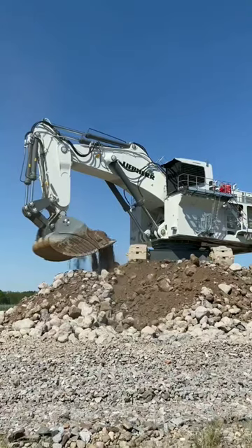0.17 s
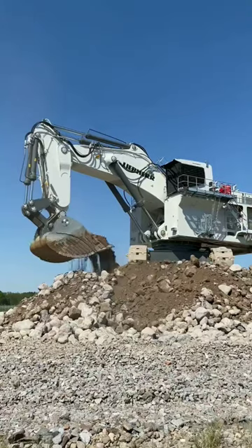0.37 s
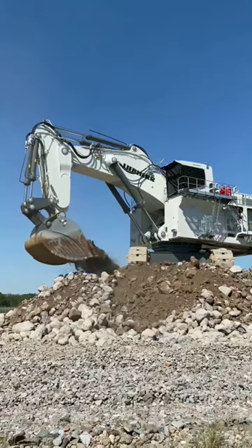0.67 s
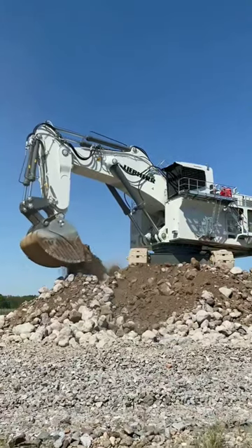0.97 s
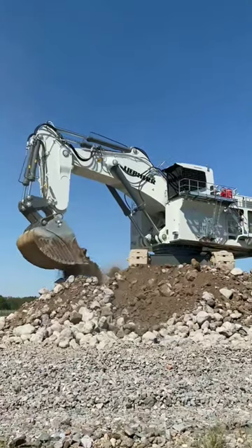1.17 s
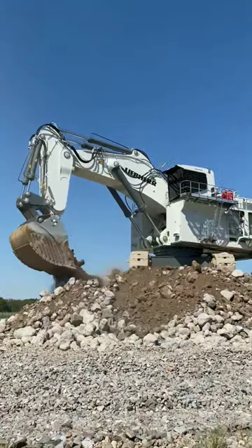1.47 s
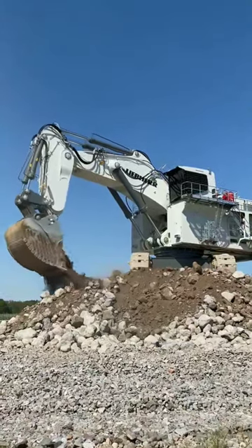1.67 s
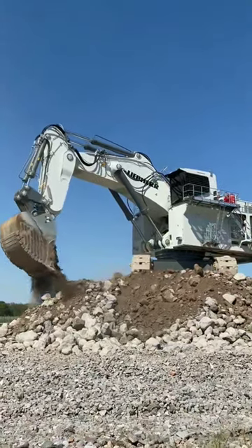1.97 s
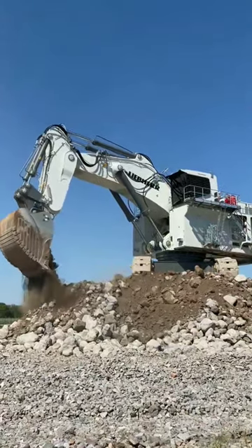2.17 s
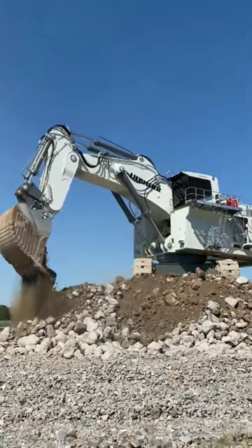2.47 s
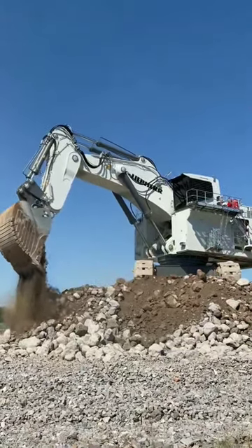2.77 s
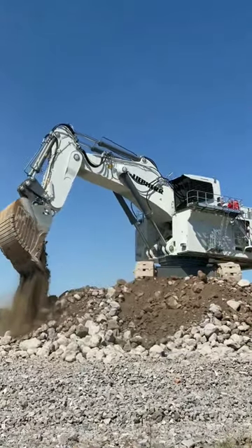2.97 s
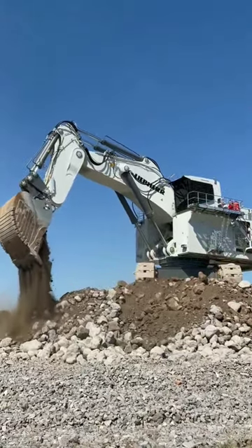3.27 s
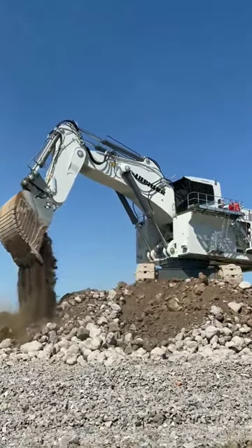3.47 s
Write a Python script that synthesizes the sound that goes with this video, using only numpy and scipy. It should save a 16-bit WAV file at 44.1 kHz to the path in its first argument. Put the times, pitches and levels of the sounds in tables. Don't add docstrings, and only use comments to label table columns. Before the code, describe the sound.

Rocks and soil pour from a big excavator's steel bucket, knocking loudly over a steady diesel roar.

```python
import sys
import numpy as np
from scipy import signal
from scipy.fft import rfft, irfft, next_fast_len
from scipy.io import wavfile
from scipy.ndimage import uniform_filter1d

SR = 44100
rng = np.random.default_rng(int(sys.argv[2]) if len(sys.argv) > 2 else 0)


def file_out(sig):
    cols = np.atleast_2d(sig).T
    lim = np.clip(cols, -1, 1)
    pcm = np.round(lim * 32767).astype(np.int16)
    wavfile.write(sys.argv[1], SR, pcm)


def attenuation_scalar(level_db):
    decades = np.asarray(level_db, float) / 20
    return 10 ** decades


N = 159201

# freq_hz, density_db_per_hz
ROAR_SPECTRUM = [(40, -8), (90, -7), (500, -1), (1100, -6.5), (2900, -13.5), (4200, -30), (7000, -22),
                 (13000, -65.5)]
# time_s, first_harmonic_db
PUMP_EFFORT = [
    (.2, -39.5),
    (1.7, -39.5),
    (2.1, -35.5),
    (2.35, -24),
    (2.55, -26.5),
    (2.62, -32.5),
    (2.86, -26.5),
    (2.95, -30),
    (3.6, -40),
]
# multiple, rest_level_db, effort_share
PUMP_HARMONICS = [(1, -40, 1.08), (2, -42, 0.32), (3, -48, 0.4), (4, -45.5, .2), (5, -46, 0.25),
                  (6, -48, 0.07), (7, -50, 0.11)]
# time_s, pitch_hz, level_db
TURBO_WHISTLE = [
    (.2, 5600, -63),
    (.7, 5700, -55),
    (1.25, 5700, -54),
    (1.6, 5950, -50),
    (2.0, 6190, -49),
    (2.35, 6170, -49),
    (2.6, 6190, -59),
    (3.2, 6300, -58),
    (3.6, 6300, -63),
]
# time_s, level_db
BUCKET_SHIFT = [
    (0.2, -32.5),
    (0.51, -22.5),
    (0.62, -36.5),
    (0.69, -21),
    (0.81, -28),
    (1.24, -23.5),
    (2.18, -34.5),
    (3.22, -23.5),
    (3.31, -21),
    (3.6, -32.5),
]
# time_s, stones_db, soil_db
POUR_LEVELS = [(.2, -45, -48), (.9, -34, -49.5), (1.45, -23.5, -39), (1.72, -32, -41.5),
               (2.3, -25.5, -41.5), (2.62, -16.5, -36), (2.8, -25, -37.5), (3.0, -15, -34.5),
               (3.12, -25.5, -29), (3.19, -40, -32), (3.32, -20, -29), (3.45, -19.5, -35.5),
               (3.6, -38.5, -36)]
# freq_hz, density_db_per_hz
SOIL_SPECTRUM = [(300, -4), (700, 1), (1300, -3), (2300, -7.5), (4500, -17), (6500, -15.5), (8500, -31.5),
                 (13500, -28)]
# start_s, peak_db, pitch_hz
ROCK_KNOCKS = [(0.252, -19, 350), (0.388, -11, 340), (0.487, -13.5, 397), (0.812, -26.5, 318),
               (0.853, -14.5, 323), (0.934, -11.5, 234), (0.971, -17, 480), (1.041, -15.5, 520),
               (1.097, -12.5, 268), (1.135, -15.5, 680), (1.224, -16, 238), (1.283, -14, 255),
               (1.292, -7.5, 267), (1.309, -17, 520), (1.38, -13, 610), (1.409, -10.5, 221),
               (1.439, -11, 603), (1.526, -7.5, 231), (1.56, -13, 276), (1.619, -10.5, 233),
               (1.804, -16, 696), (2.134, -11.5, 598), (2.153, -1, 400), (2.158, -6.5, 566),
               (2.195, -9, 606), (2.335, -9.5, 624), (2.361, -13, 230), (2.467, -26, 510),
               (2.499, -5.5, 497), (2.549, -7, 390), (2.578, -1.5, 1080), (2.635, -4.5, 442),
               (2.649, -1, 523), (2.665, -0.5, 420), (2.696, -17, 577), (2.736, -4, 383), (2.758, -7, 670),
               (2.798, -13.5, 610), (2.839, -13, 643), (2.87, -2, 690), (2.878, -1.5, 633),
               (2.927, -2, 398), (2.947, -3, 344), (2.979, -7.5, 470), (2.988, -2, 460), (3.01, -13, 991),
               (3.021, -5, 508), (3.055, -3.5, 584), (3.081, -7.5, 626), (3.11, -4.5, 498), (3.19, -7, 750),
               (3.284, -6.5, 770), (3.336, -4.5, 1020), (3.362, -3.5, 560), (3.377, -5, 508),
               (3.419, -2, 700), (3.422, -3, 513), (3.488, -13, 466), (3.56, -11, 600), (3.568, -1.5, 655)]
# start_s, peak_db, pitch_hz
STONE_CLACKS = [(0.362, -21.5, 1760), (0.999, -14.5, 800), (1.133, -29, 6540), (1.403, -19.5, 2190),
                (1.546, -21, 1620), (1.653, -13.5, 1600), (1.905, -26, 3040), (1.94, -20, 3700),
                (2.012, -17, 1800), (2.04, -21, 1720), (2.191, -23.5, 4930), (2.5, -14.5, 1170),
                (2.492, -15.5, 1770), (2.555, -15.5, 3600), (2.579, -5, 2720), (2.584, -9.5, 1550),
                (2.632, -15.5, 1730), (2.764, -21, 7800), (2.877, -24, 2600), (2.904, -12.5, 1650),
                (2.931, -19, 1660), (3.186, -11, 1780), (3.197, -27, 1550), (3.484, -38, 7500),
                (3.362, -28, 5000), (3.499, -11.5, 1870), (3.543, -21, 1710), (3.569, -18, 2220)]
# start_s, peak_db, pitch_hz
BUCKET_THUDS = [(0.447, -17, 90), (0.49, -10.5, 108), (0.673, -6.5, 116), (0.719, -16, 86.1),
                (1.012, -8, 160), (1.075, -14, 109), (1.11, -9, 95.6), (1.14, -14, 99), (1.2, -6.5, 110.5),
                (1.33, -13.5, 70), (1.35, -9, 248), (1.375, -13, 153), (1.418, -11, 162), (1.47, -10, 264),
                (1.5, -14, 280), (1.53, -7.5, 72.7), (1.585, -10, 89), (1.59, -12.5, 200),
                (1.777, -11.5, 82), (2.944, -9, 189), (3.24, -5, 219), (3.35, -5.5, 108)]
# start_s, peak_db, pitch_hz
PEBBLE_PINGS = [
    (2.763, -19, 5890),
    (2.902, -22, 5370),
]
# time_s, level_db
GRAVEL_SWELLS = [
    (.2, -62),
    (2.9, -54),
    (3.02, -37),
    (3.11, -31),
    (3.17, -41),
    (3.22, -45),
    (3.3, -33),
    (3.38, -36),
    (3.45, -52),
    (3.6, -58),
]
# freq_hz, lead_rad
MACHINE_LEAD = [(100, 0), (1000, -.5), (2000, -.1), (2700, -1.6), (3800, -.3), (5000, 1.9), (8000, 3.14),
                (12500, 8.2)]
# freq_hz, lead_rad
HEAP_LEAD = [(100, 0), (1000, -.3), (1800, .1), (2700, 3.4), (4000, 6.4), (5200, 8.2), (8000, 9.42),
             (12500, 14)]
# freq_hz, share_0_to_1
DIRECT_SHARE = [(60, .92), (250, .6), (700, .78), (1500, .93), (2400, .62), (3700, .35), (6000, .7),
                (11000, .4)]
# freq_hz, left_minus_right_db
PORT_TILT = [(200, 0), (900, 4.5), (1400, 3), (2200, 2), (3000, 2), (4000, -4.5), (5500, 1.5), (12000, -1)]
# start_s, length_s
SHARP_ATTACKS = [
    (.18, .008),
    (1.132, .005),
    (2.19, .007),
    (2.548, .016),
    (2.76, .009),
    (3.478, .008),
    (3.497, .008),
]


def in_time(rows):
    time_s, *columns = np.transpose(rows)
    return [np.interp(np.arange(N) / SR, time_s, column) for column in columns]


def at_hz(points, hz):
    freq_hz, value = np.array(points).T
    return np.interp(np.log(hz + 1), np.log(freq_hz), value)


def rms_one(x):
    return x / np.sqrt(np.mean(x ** 2) + 1e-20)


def drift(rate_hz):
    r = np.exp(-80 * np.pi * rate_hz / SR)
    noise = rng.standard_normal(N // 40 + 2002)
    slow = signal.lfilter([1], [1, -2 * r, r * r], noise)[2000:]
    return np.interp(np.arange(N) / 40, np.arange(len(slow)), rms_one(slow))


def ring(clicks, hz, t60_s):
    r = attenuation_scalar(-60 / (t60_s * SR))
    w = 2 * np.pi * hz / SR
    return signal.lfilter([0, np.sin(w)], [1, -2 * r * np.cos(w), r * r], clicks + 1e-18)


def bandpass(x, low_hz, high_hz):
    return signal.sosfilt(signal.butter(2, [low_hz, high_hz], "band", fs=SR, output="sos"), x)


def banded_noise(spectrum, shared_db, own_db, rate_hz):
    out = 0
    together = drift(rate_hz)
    edges_hz = 30 * 2 ** np.arange(0, 9.1, .5)
    white = rng.standard_normal((2, 3, N))
    for k, (low_hz, high_hz) in enumerate(zip(edges_hz, edges_hz[1:])):
        level_db = at_hz(spectrum, np.sqrt(low_hz * high_hz))
        flicker_db = shared_db * together + own_db * drift(rate_hz)
        out = out + bandpass(white[k % 2], low_hz, high_hz) * attenuation_scalar(level_db + flicker_db)
    return rms_one(out)


def grains(per_s, low_hz, high_hz, cycles, spread_db, tilt_db):
    sizes = attenuation_scalar(spread_db * np.minimum(rng.exponential(1, (3, N)), 4)) * rng.choice([-1, 1], (3, N))
    born = rng.random((3, N)) < per_s / SR
    dealt = rng.integers(0, 16, N)
    out = 0
    for k, hz in enumerate(np.geomspace(low_hz, high_hz, 16)):
        clicks = sizes * born * (dealt == k)
        out = out + ring(clicks, hz, cycles / hz) * attenuation_scalar(tilt_db * np.log2(hz / low_hz))
    highpass = signal.butter(2, 1.26 * low_hz, "high", fs=SR, output="sos")
    return rms_one(signal.sosfilt(highpass, out))


def blows(rows, upper, cycles, rise, crack_db, gain_db):
    out = np.zeros(N + SR)
    chance = rng.uniform(0, 1, (len(rows), 2))
    for (start_s, peak_db, hz), (u, v) in zip(rows, chance):
        t = np.arange(int(cycles / hz * SR) + 200) / SR
        shape = (1 - np.exp(-t * hz / rise)) * attenuation_scalar(-60 * t * hz / cycles)
        upper_hz = hz * (1.36 + 0.36 * u)
        body = np.sin(2 * np.pi * hz * t) + upper * np.sin(2 * np.pi * (upper_hz * t + v))
        lowpass = signal.butter(3, min(2 * hz, 15000), fs=SR)
        noise = signal.lfilter(*lowpass, 2.5 * rng.standard_normal(len(t)))
        crack = attenuation_scalar(crack_db) * noise * np.exp(-t / .0009)
        i = int(start_s * SR)
        out[i:i + len(t)] += attenuation_scalar(peak_db + gain_db) * (shape / shape.max() * body + crack)
    return out[:N]


def scattered(x):
    t60_s = 0.13
    t = np.arange(SR // 5) / SR
    tail = rng.standard_normal((2, len(t))) * attenuation_scalar(-60 * t / t60_s)
    tail = tail / np.sqrt(np.sum(tail ** 2, axis=1, keepdims=True))
    return np.vstack([x, signal.fftconvolve(x[None], tail, axes=1)[:, :N]])


def engine_roar():
    firing_hz, firing_depth, roar_db = 108.0, .14, -27
    firing_phase = 2 * np.pi * np.cumsum(firing_hz * (1 + 0.0228 * drift(4.0))) / SR
    firing = 1 + firing_depth * np.sin(firing_phase)
    roar = attenuation_scalar(roar_db) * firing * banded_noise(ROAR_SPECTRUM, shared_db=1.0, own_db=0.8, rate_hz=17.0)
    return signal.sosfilt(signal.butter(10, 12500, fs=SR, output="sos"), roar)


def pump_hum():
    pump_hz, wander = 215.5, 0.005
    effort_db, = in_time(PUMP_EFFORT)
    turn = 2 * np.pi * np.cumsum(pump_hz * (1 + wander * drift(2.96))) / SR
    out = 0
    for k, rest_db, share in PUMP_HARMONICS:
        flicker_db = min(1.7 * k, 4.5) * drift(8)
        level = attenuation_scalar(rest_db + share * (effort_db + 38) + flicker_db)
        out = out + level * np.sin(k * turn + 0.31 * k * drift(4.86))
    return out


def turbo_whistle():
    hz, level_db = in_time(TURBO_WHISTLE)
    phase = 2 * np.pi * np.cumsum(hz * (1 + 0.008 * drift(90))) / SR
    return attenuation_scalar(level_db - .5 + 3.5 * drift(30)) * np.sin(phase)


def engine():
    return engine_roar() + np.sqrt(2) * (pump_hum() + turbo_whistle())


def bucket():
    shift_db, = in_time(BUCKET_SHIFT)
    rolling = grains(420, 51.4, 362.0, cycles=16.5, spread_db=3.0, tilt_db=1.0)
    thuds = blows(BUCKET_THUDS, upper=0.46, cycles=7.8, rise=0.3, crack_db=-52, gain_db=-4.0)
    return attenuation_scalar(shift_db + 1.5) * rolling + scattered(thuds)


def pouring():
    stones_db, soil_db = in_time(POUR_LEVELS)
    soil = banded_noise(SOIL_SPECTRUM, shared_db=2.0, own_db=2.3, rate_hz=22.6)
    stones = grains(600, 197.0, 1140.0, cycles=5.5, spread_db=2.5, tilt_db=1.0)
    grit_per_s = 900 * attenuation_scalar(2.0 * drift(13))
    grit = grains(grit_per_s, 1503.0, 10800.0, cycles=21.0, spread_db=6.0, tilt_db=-9.0)
    chips = grains(500, 2317.0, 6950.0, cycles=110.0, spread_db=0.2, tilt_db=-5.5)
    out = attenuation_scalar(11 + soil_db) * soil + attenuation_scalar(-0.5 + stones_db) * stones
    return out + attenuation_scalar(soil_db) * grit + attenuation_scalar(7.5 + 1.17 * soil_db) * chips


def stone_blows():
    knocks = blows(ROCK_KNOCKS, upper=0.44, cycles=10.0, rise=1.1, crack_db=-28, gain_db=-2.5)
    clacks = blows(STONE_CLACKS, upper=.6, cycles=18.0, rise=.4, crack_db=-4, gain_db=1.5)
    pings = blows(PEBBLE_PINGS, upper=.03, cycles=90.0, rise=6.0, crack_db=-20, gain_db=-1.5)
    return scattered(knocks + clacks + pings)


def sliding_gravel():
    level_db, = in_time(GRAVEL_SWELLS)
    return attenuation_scalar(level_db) * grains(1500, 2900.0, 5600.0, cycles=80.0, spread_db=3.5, tilt_db=0.5)


def heap():
    return pouring() + stone_blows() + sliding_gravel()


def ports(rows, lead):
    dip_hz, dip_width_hz, dip_depth_db = 3700, 356, -4.5
    size = next_fast_len(N + SR // 2)
    hz = np.arange(size // 2 + 1) * SR / size
    spectra = rfft(rows, size)
    share = np.clip(at_hz(DIRECT_SHARE, hz), 0, 1)
    side = np.array([[.5], [-.5]])
    direct = np.sqrt(share) * np.exp(1j * side * at_hz(lead, hz)) * spectra[0]
    diffuse = np.sqrt(1 - share) * spectra[1:]
    dip_db = dip_depth_db * np.exp(-((hz - dip_hz) / dip_width_hz) ** 2)
    return irfft((direct + diffuse) * attenuation_scalar(dip_db + side * at_hz(PORT_TILT, hz)), size)[:, :N]


def scene():
    return ports(engine() + bucket(), MACHINE_LEAD) + ports(heap(), HEAP_LEAD)


def treble_loss(x):
    gap_low_hz, gap_high_hz, top_hz = 7500, 9646, 13500
    # low_hz, high_hz, bias towards loss
    fringes = [(6650, 6950, -1.5), (6950, 7250, 1.5), (7250, gap_low_hz, 3.5),
               (12700, 13100, 5), (13100, top_hz, 8.5)]
    t = np.arange(N) / SR
    hz = np.arange(N // 2 + 1) * SR / N
    mid = rfft(x.mean(axis=0))

    def part(spectrum, low_hz, high_hz):
        return irfft(spectrum * ((hz > low_hz) & (hz < high_hz)), N)

    lost = part(mid, gap_low_hz, gap_high_hz) + part(rfft(x), top_hz, SR)
    for low_hz, high_hz, bias in fringes:
        share = np.clip(3 * drift(12) + bias - 1.7 * t, 0, 1)
        lost = lost + part(mid, low_hz, high_hz) * share
    sharp = sum((t > start_s) & (t < start_s + length_s) for start_s, length_s in SHARP_ATTACKS)
    return uniform_filter1d(1. - .6 * sharp, size=200) * lost


def roll_off(x):
    return signal.sosfilt(signal.butter(12, 15720, fs=SR, output="sos"), x)


def record(dry):
    start_s = .1805
    x = signal.sosfilt(signal.butter(3, 45.0, "high", fs=SR, output="sos"), np.tanh(dry))
    x = (x - treble_loss(x)) * (np.arange(N) / SR > start_s)
    return roll_off(x)


dry = scene()
out = record(dry)
file_out(out)
```